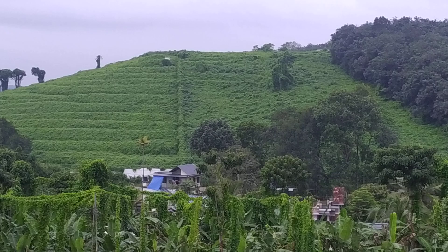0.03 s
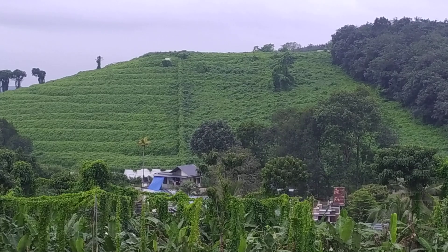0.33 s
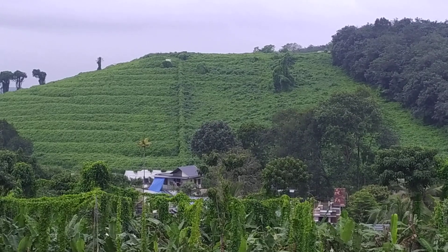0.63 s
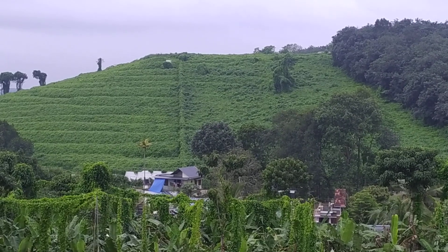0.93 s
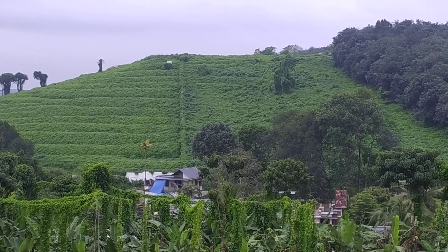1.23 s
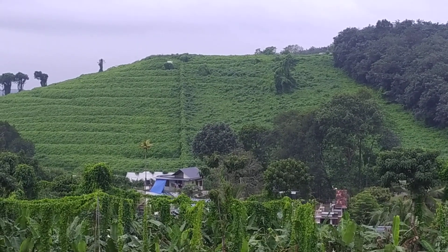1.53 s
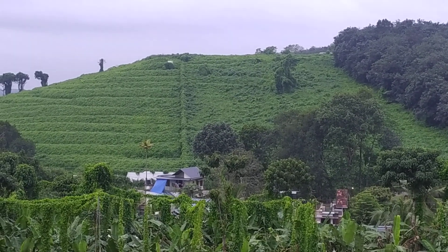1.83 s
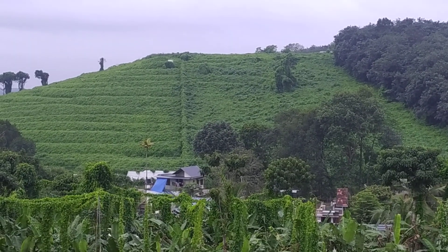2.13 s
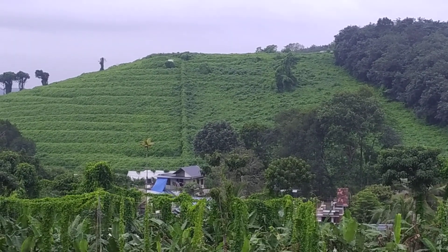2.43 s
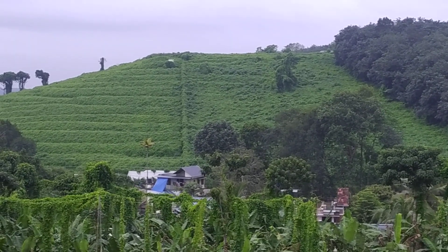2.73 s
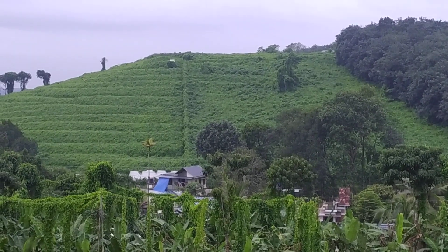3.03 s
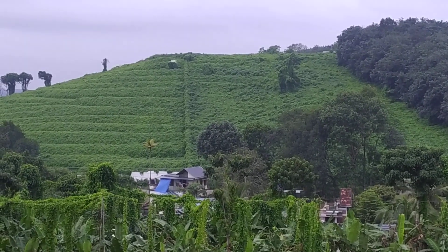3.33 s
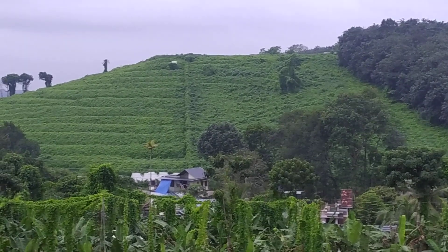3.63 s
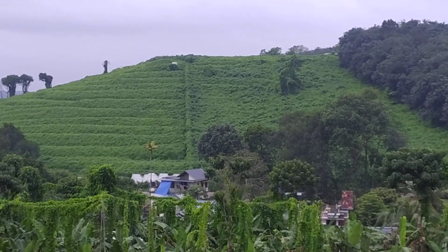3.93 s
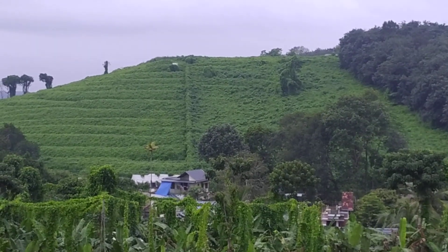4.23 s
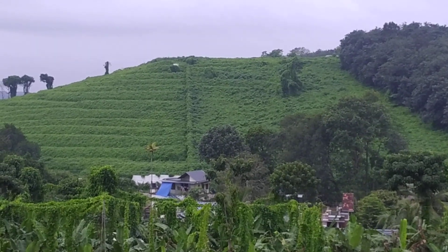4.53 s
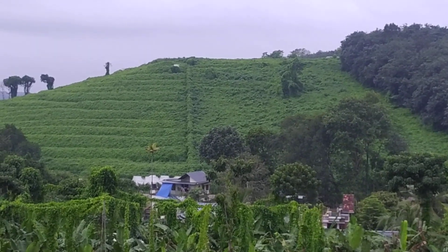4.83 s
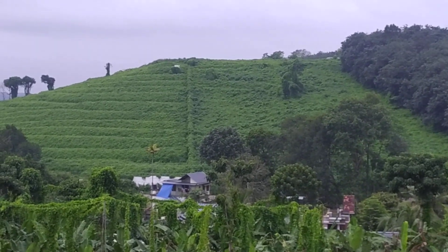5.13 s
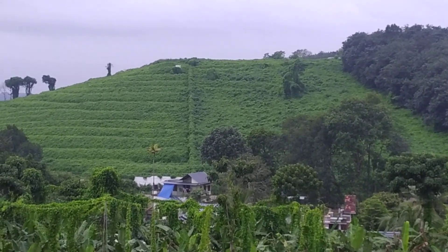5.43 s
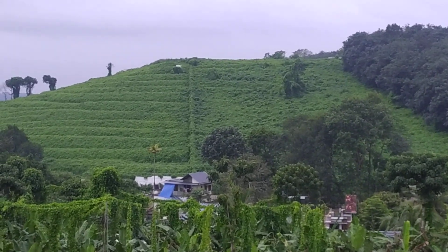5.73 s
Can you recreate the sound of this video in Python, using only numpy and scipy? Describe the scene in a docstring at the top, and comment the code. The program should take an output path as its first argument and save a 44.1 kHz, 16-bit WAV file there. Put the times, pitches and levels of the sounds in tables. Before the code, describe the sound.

A dense, high-pitched insect chorus fills an open hillside, with two nearby bush crickets chirping in and out of step over a soft rush of air. Small birds peep and whistle faintly, and a distant horn gives two brief, quiet toots. Wind begins to buffet the microphone, mostly on the right, and grows into strong rumbling thumps at the end, when a frog gives one short rattle on the left.

```python
"""A green hillside above a valley. Insects shrill by stridulation over a low rush of air: a dense
chorus, two near bush crickets drifting in and out of step, and a softer, lower one. Small birds peep
and whistle, a far motorbike horn toots twice and a frog rattles, all scattered by trees and slopes.
Turbulent gusts buffet the microphone, mostly its right port, and grow strong at the end."""
import sys
import numpy as np
from scipy import signal
from scipy.fft import rfft, irfft, next_fast_len
from scipy.io import wavfile
from scipy.ndimage import map_coordinates

SR = 44100
rng = np.random.default_rng(int(sys.argv[2]) if len(sys.argv) > 2 else 0)


def store_pcm(level_fs):
    """Save levels as 16-bit WAV."""
    pcm = np.round(np.clip(level_fs, -1, 1) * 32767).astype(np.int16)
    wavfile.write(sys.argv[1], SR, np.atleast_2d(pcm).T)


N = 263277
T = np.arange(N) / SR


def amp(db):
    """Amplitude ratio of a level in decibels."""
    return 10 ** (np.asarray(db) / 20)


def unit(x):
    """Normalisation to rms 1."""
    return x / np.sqrt(np.mean(x ** 2) + 1e-20)


def along(points, hz):
    """Interpolation of (frequency_hz, value) points on a logarithmic axis."""
    knots_hz, values = np.transpose(points)
    return np.interp(np.log(hz + 1), np.log(knots_hz + 1), values)


def curve(points):
    """Linear interpolation of (time_s, value) points at every sample."""
    return np.interp(T, *np.transpose(points))


def wobble(rate_hz, n=N):
    """Smooth random modulation: a spline through Gaussian knots."""
    knots = rng.standard_normal(int(n * rate_hz / SR) + 4)
    return map_coordinates(knots, [T[:n] * rate_hz])


def filtered(x, response):
    """Linear filtering: the spectrum times a frequency response."""
    size = next_fast_len(N + SR // 2)
    hz = np.fft.rfftfreq(size, 1 / SR)
    return irfft(rfft(x, size) * response(hz), size)[..., :N]


def coloured(x, spectrum):
    """Spectral shaping by (frequency_hz, gain_db) points, at rms 1."""
    return unit(filtered(x, lambda hz: amp(along(spectrum, hz))))


def noise():
    """White noise, uncorrelated between the ears."""
    return rng.standard_normal((2, N))


def pan(pan_db):
    """Interaural level difference at constant power; positive is left."""
    ratio = amp(np.atleast_1d(pan_db))
    return np.array([ratio, np.ones_like(ratio)]) * np.sqrt(2 / (1 + ratio ** 2))


def add(track, start_s, sound):
    """Superposition of a sound on a track."""
    part = track[..., round(start_s * SR):][..., :sound.shape[-1]]
    part += sound[..., :part.shape[-1]]


def note(length_s, start_hz, end_hz, taper, waver_hz=0, swell_db=0, bend=1):
    """Frequency modulation: a soft-edged, gliding sine; a bend over 1 puts the glide late."""
    n = int(length_s * SR)
    progress = np.linspace(0, 1, n)
    pitch_hz = start_hz + (end_hz - start_hz) * progress ** bend + waver_hz * wobble(400, n)
    envelope = amp(swell_db * (progress - 0.5)) * signal.windows.tukey(n, taper)
    return np.sqrt(2) * envelope * np.sin(2 * np.pi * np.cumsum(pitch_hz) / SR)


def valley(x, wet_db, t60_s):
    """Reverberation: trees and slopes scatter a diffuse, decaying tail back to each ear."""
    t = T[:SR]
    build_up = 1 - np.exp(-t / 0.0021)
    tail = rng.standard_normal((2, SR)) * amp(-60 * t / t60_s) * build_up
    tail /= np.linalg.norm(tail, axis=1, keepdims=True)
    return x + amp(wet_db) * signal.fftconvolve(x, tail, axes=1)[:, :N]


# Spectra of the chorus and of the far insects' hiss: frequency_hz, gain_db
CHORUS_SPECTRUM = [(6000, -45), (6900, -28), (7250, -6.5), (7650, 1), (8050, 4), (8700, 2), (9000, -3),
                   (9500, 0.5), (10000, -1), (10400, -6), (10700, -34)]
HISS_SPECTRUM = [(2900, -38), (3300, 6), (3600, 4), (4030, 12), (4500, 5), (5000, 4), (5600, 7.5),
                 (6500, -0.5), (7500, -1)]
# Direction of the chorus: frequency_hz, pan_db
CHORUS_BALANCE = [(7000, -1.5), (9200, -6.5), (9750, 0), (10500, 19)]


def chorus():
    """Incoherent summation: countless insects merge into a shrill, grainy band above a faint hiss."""
    grain_db = 1.3 * np.array([wobble(520), wobble(520)]) + 0.12 * wobble(6.3)
    band = coloured(amp(grain_db) * noise(), CHORUS_SPECTRUM)
    shrill = filtered(band, lambda hz: pan(along(CHORUS_BALANCE, hz)))
    return amp(-43) * shrill + amp(-56.5) * coloured(noise(), HISS_SPECTRUM)


# Spectrum of the valley's air: frequency_hz, gain_db
AIR_SPECTRUM = [(20, 7.5), (60, 10), (120, 7.5), (200, 10.5), (300, 5.5), (420, 1.5), (620, 4), (880, -3),
                (1120, 3), (1370, -5.5), (1580, -0.5), (1750, -5), (1950, -1.5), (2400, -2.5), (2900, -4.5),
                (3300, -6)]
# Likeness of the air at the two ears: frequency_hz, coherence
AIR_COHERENCE = [(40, 1), (190, 1), (600, 0.82), (1070, 0.096), (3400, 0.032), (6000, 0.1)]
# Strength of the rush: time_s, level_db
AIR_LEVELS = [(.8, -48), (3.4, -47.5), (5.4, -49)]


def air():
    """Interaural coherence: the valley's steady rush is alike in both ears only in the bass."""
    def mid_and_side(hz):
        angle = np.arccos(along(AIR_COHERENCE, hz)) / 2
        return np.array([np.cos(angle), np.sin(angle)]) / np.sqrt(1 + (hz / 3250) ** 40)  # low-pass

    mid, side = filtered(coloured(noise(), AIR_SPECTRUM), mid_and_side)
    return amp(curve(AIR_LEVELS)) * unit(np.array([mid + side, mid - side]))


def stridulation(chirps, width_s, stroke_hz, sharpness, wing):
    """Resonant excitation: a chirp is a swelling run of strokes, each scraping the wing's resonance."""
    power = np.zeros(N)
    lead_s = 0.25
    chirp = np.exp(-2 * abs((T[:SR // 2] - lead_s) / width_s) ** 2.7)
    for crest_s, relative_db in chirps:
        add(power, crest_s - lead_s, amp(relative_db) ** 2 * chirp)
    cycles = np.cumsum(stroke_hz * (1 + 0.03 * wobble(14))) / SR
    strokes = 1 + sharpness * np.exp(-(cycles % 1) / 0.35)  # each starts with a catch of the file
    return np.sqrt(power) * coloured(strokes * noise(), wing)


# Bouts of song between short rests: first_chirp_s, last_chirp_s, chirp_count
LOW_BOUTS = [(.385, 2.59, 15), (3.0, 3.95, 7), (4.37, 5.17, 6), (5.58, 5.89, 3)]
# Resonance of the lower cricket's wing: frequency_hz, gain_db
LOW_RESONANCE = [(4800, -39), (5500, -8.5), (5800, 4), (6050, -3.5), (6350, -3), (6800, -47)]


def low_cricket():
    """Stridulation at a lower resonance: a farther cricket sings quick, evenly spaced chirps."""
    chirps = [(crest_s, rng.normal(0, 1)) for bout in LOW_BOUTS for crest_s in np.linspace(*bout)]
    song = stridulation(chirps, width_s=0.041, stroke_hz=140, sharpness=0.36, wing=LOW_RESONANCE)
    return amp(-60.5) * pan(3.3) * song


# Chirps of the bush crickets on the right and in front: crest_s, relative_db
RIGHT_CHIRPS = [(.44, -6), (.57, 0), (.78, 0), (.99, 0), (1.15, -2), (1.36, -0.5), (1.58, 0.5), (1.76, -1),
                (2.0, -7), (2.16, -7), (2.4, -3), (2.59, -3), (2.79, -11), (2.96, -2.5), (3.12, 0.5),
                (3.28, -1), (3.56, 3), (3.79, 2), (4.0, 1), (4.28, 0.5), (4.55, 3), (4.76, 1), (4.98, -2),
                (5.22, 0), (5.46, -1), (5.65, -1.5), (5.87, -1)]
FRONT_CHIRPS = [(.41, -0.5), (.61, -3), (.79, -2), (1.01, -1.5), (1.2, -1), (1.37, 0), (1.59, -3),
                (1.81, -2), (2.03, -1.5), (2.19, 1.5), (2.4, -1), (2.62, 1), (2.8, 0), (3.03, -0.5),
                (3.2, -4), (3.36, 1), (3.59, -6), (3.8, -4), (4.03, -4), (4.17, 0.5), (4.36, 2),
                (4.55, -0.5), (4.74, -1), (4.91, -1), (5.08, -2.5), (5.28, -3), (5.49, -0.5), (5.67, -3),
                (5.87, -1.5)]
# Resonance of their wings: frequency_hz, gain_db
BUSH_WING = [(6300, -47), (7000, -14), (7600, -6), (8050, 3), (8400, 1.5), (8750, 1), (9000, -11),
             (10000, -32), (10800, -42)]


def bush_crickets(stroke_hz=79.5):
    """Stridulation in two rhythms: the near bush crickets drift in and out of step."""
    right = stridulation(RIGHT_CHIRPS, width_s=0.073, stroke_hz=stroke_hz, sharpness=2, wing=BUSH_WING)
    front = stridulation(FRONT_CHIRPS, width_s=0.082, stroke_hz=stroke_hz, sharpness=1.6, wing=BUSH_WING)
    return amp(-44.5) * (pan(-7) * right + front)


# A small bird's peeps, mostly in pairs: start_s, relative_db
PEEP_NOTES = [(0.651, -58.5), (.708, -60), (0.859, -56), (.9, -61), (1.21, -63), (1.26, -63),
              (1.725, -55.5), (1.775, -58), (1.939, -62), (2.08, -61), (2.213, -56.5), (2.262, -60),
              (2.55, -60), (3.08, -55), (3.126, -57), (3.184, -60), (3.3, -57), (3.353, -59), (3.514, -61),
              (3.56, -60), (3.74, -61), (3.788, -60), (3.84, -63), (3.896, -63), (3.948, -61), (4.135, -59),
              (4.18, -61), (4.34, -57), (4.389, -56), (4.44, -59.5), (4.945, -58), (4.996, -63),
              (5.39, -65), (5.442, -58), (5.497, -60)]
# Spectrum of their echo: frequency_hz, gain_db
FOLIAGE_SPECTRUM = [(2750, -38), (3020, -5), (3300, -4.5), (3550, -40)]


def peeps(length_s=0.036, fall_hz=440, echo_crest_s=0.018):
    """Scattering: foliage blurs each brief, falling peep from far off on the left."""
    direct, echo_power = np.zeros(N), np.zeros(N)
    age = T[:SR // 4] / echo_crest_s
    blur = age * np.exp(1 - age)
    for start_s, relative_db in PEEP_NOTES:
        pitch_hz = rng.normal(3400, 36.6)
        peep = note(length_s, pitch_hz, pitch_hz - fall_hz, taper=0.9, waver_hz=130)
        add(direct, start_s, amp(relative_db) * peep)
        add(echo_power, start_s, amp(relative_db) ** 2 * blur)
    echo = np.sqrt(echo_power) * coloured(noise(), FOLIAGE_SPECTRUM)
    return pan(7.7) * (amp(-3.5) * direct + amp(-1) * echo)


# Far calls, mostly masked by the air: start_s, length_s, start_hz, end_hz, level_db
HOARSE_CALLS = [(0.696, 2.25, 1950, 2016, -64.5), (3.837, 0.325, 1910, 1875, -58.5)]


def far_calls():
    """Pitch jitter: fast wavering makes the drawn-out calls far to the right sound hoarse."""
    calls = np.zeros(N)
    for start_s, length_s, start_hz, end_hz, level_db in HOARSE_CALLS:
        add(calls, start_s, amp(level_db) * note(length_s, start_hz, end_hz, taper=0.22, waver_hz=119.6))
    return valley(calls * pan(-9), wet_db=-1.5, t60_s=0.63)


# Two songs of three whistles: start_s, length_s, start_hz, end_hz, level_db, swell_db, pan_db, waver_hz
SONG_NOTES = [(1.061, 0.13, 5130, 5125, -53.5, 3, 9, 28), (1.185, 0.094, 5120, 5160, -54, -1, 7, 30),
              (1.293, 0.14, 5190, 5350, -55.5, -5, 4, 55), (3.286, .175, 5110, 5100, -57.5, 19, 5, 25),
              (3.515, 0.095, 5120, 5190, -55, 3, 3, 30), (3.61, .09, 5200, 5400, -59.5, -7, 0, 70)]


def whistles():
    """Frequency modulation: a bird holds two thin notes nearly level, then a third frays and rises."""
    songs = np.zeros((2, N))
    for start_s, length_s, start_hz, end_hz, level_db, swell_db, pan_db, waver_hz in SONG_NOTES:
        whistle = note(length_s, start_hz, end_hz, taper=0.4, waver_hz=waver_hz, swell_db=swell_db, bend=2)
        add(songs, start_s, amp(level_db) * pan(pan_db) * whistle)
    return valley(songs, wet_db=-4, t60_s=0.9)


# A bird's down-slurs: start_s, length_s, start_hz, end_hz, level_db
SLUR_NOTES = [(1.2, .105, 6250, 4550, -59.5), (2.94, .06, 4550, 3650, -64), (3.68, .075, 6250, 4750, -58.5),
              (5.513, .085, 6200, 5200, -60)]


def down_slurs():
    """Frequency sweep: each slur fades as it falls and echoes off the slope."""
    slurs = np.zeros(N)
    for start_s, length_s, start_hz, end_hz, level_db in SLUR_NOTES:
        slur = note(length_s, start_hz, end_hz, taper=0.22, waver_hz=150, swell_db=-5.5)
        add(slurs, start_s, amp(level_db) * slur)
    return valley(slurs * pan(1.5), wet_db=3, t60_s=0.5)


# Gusts at the microphone's ports: crest_s, decay_s, left_db, right_db
PORT_GUSTS = [(1.927, 0.12, -55, -45.5), (2.562, 0.074, -50, -32), (2.66, 0.07, -55, -24.5),
              (2.909, 0.045, -42, -52), (3.717, 0.2, -44, -39.5), (3.847, 0.076, -35.5, -38.5),
              (4.018, 0.11, -37.5, -37), (4.091, 0.032, -46, -26), (4.24, 0.11, -59, -36),
              (4.489, 0.049, -62, -27.5), (4.65, 0.076, -58, -29.5), (5.232, 0.14, -33, -47),
              (5.322, 0.05, -20.5, -32), (5.426, 0.091, -30, -22.5), (5.54, 0.045, -33, -19),
              (5.654, 0.14, -31, -17.5), (5.866, 0.24, -45, -28.5)]


def gusts(rise_over_fall=0.67, floor_db=-61):
    """Addition of powers: the wind's envelope sums gusts that rise quickly and die more slowly."""
    power = np.zeros((2, N))
    for crest_s, decay_s, left_db, right_db in PORT_GUSTS:
        from_crest = np.maximum((crest_s - T) / rise_over_fall, T - crest_s) / decay_s
        power += amp([[left_db], [right_db]]) ** 2 * np.exp(-2 * from_crest ** 1.12)  # pointed crest
    return np.sqrt(power + amp(floor_db) ** 2)


# Spectra of the dull buffet and of flow catching the port's edge: frequency_hz, gain_db
BUFFET_SPECTRUM = [(12, -14), (25, 5), (65, 2.5), (110, -3.5), (200, -12), (330, -34), (640, -53),
                   (1200, -78), (2000, -120)]
EDGE_SPECTRUM = [(20, -4), (60, 3), (105, -1), (140, 0.5), (162, 4.5), (185, -1), (220, 2.5), (285, -10),
                 (330, -13), (550, -28), (840, -40.5), (1200, -40), (2600, -120)]
# How much the wind catches the edge: time_s, power_share
EDGE_SHARE = [(4.1, 0.09), (4.45, 0.64), (4.8, 0.2), (5.3, 0.96)]


def wind():
    """Turbulence at each port: a dull buffet turns bright and hollow when it catches the edge."""
    share = curve(EDGE_SHARE)
    dull = np.sqrt(1 - share) * coloured(noise(), BUFFET_SPECTRUM)
    bright = np.sqrt(share) * coloured(noise(), EDGE_SPECTRUM)
    flutter = amp(1.88 * np.array([wobble(38), wobble(35)]))
    return gusts() * unit(flutter * (dull + bright))


# The horn's toots: start_s, length_s, level_db, swell_db
HORN_TOOTS = [(2.375, 0.079, -56, 7), (2.603, 0.15, -55, 3)]
# Its partials that carry: pitch_hz, relative_db, pan_db
HORN_PARTIALS = [(2605, 1.5, -9), (2980, -15, 0), (3180, -14, 0), (3360, -3, 7), (3760, -11.5, 0)]


def horn():
    """Diaphragm vibration: two far toots arrive as a few high partials with a rasp between them."""
    partials, rasp_envelope = np.zeros((2, N)), np.zeros(N)
    for start_s, length_s, level_db, swell_db in HORN_TOOTS:
        for pitch_hz, relative_db, pan_db in HORN_PARTIALS:
            tone = note(length_s, pitch_hz, pitch_hz, taper=0.4, waver_hz=0.011 * pitch_hz,
                        swell_db=swell_db)
            add(partials, start_s, amp(level_db + relative_db) * pan(pan_db) * tone)
        crest_s = start_s + 0.87 * length_s
        rasp_envelope += amp(level_db) * np.exp(-((T - crest_s) / (0.5 * length_s)) ** 2)
    rasp = rasp_envelope * coloured(noise(), [(2000, -30), (2600, -1), (3400, -1), (3900, -7), (4300, -32)])
    flicker = amp(2 * wobble(45))
    return valley(flicker * partials + amp(-1) * rasp, wet_db=-5, t60_s=0.3)


# Single eddies that thump a port: centre_s, relative_db, pitch_hz, pan_db
PORT_EDDIES = [(2.685, -20, 89.5, -37), (4.091, -24.5, 160, -23), (4.126, -24, 109, -23),
               (4.456, -21.5, 210, -18), (4.624, -22, 166, -26), (5.321, -18.5, 240, 23),
               (5.424, -20.5, 225, -14), (5.526, -24, 90, -20), (5.546, -11.5, 221, -27),
               (5.592, -24, 320, -20), (5.627, -14, 153, -22), (5.641, -14, 406, -37),
               (5.649, -8.5, 225, -20), (5.655, -17.5, 332, -24), (5.677, -17.5, 175, -21),
               (5.696, -19.5, 272, -26), (5.717, -14.5, 140, -25), (5.75, -14.5, 100, -26),
               (5.77, -18.5, 85, -24), (5.817, -15, 150, -24), (5.856, -14.5, 167, -30),
               (5.938, -19, 173, -24)]


def eddies():
    """Vortex pressure: each passing eddy is a dip between two smaller rises."""
    thumps = np.zeros((2, N))
    lead_s = 0.02
    for centre_s, relative_db, pitch_hz, pan_db in PORT_EDDIES:
        phase = np.pi * pitch_hz * (T[:SR // 25] - lead_s)
        pressure = (2 * phase ** 2 - 1) * np.exp(-phase ** 2)
        add(thumps, centre_s - lead_s, amp(relative_db - 2.5) * pan(pan_db) * pressure)
    return thumps


def frog(start_s=5.753, spacing_s=0.0155, count=5, crest_hz=2436, crest_db=-47):
    """Pulse train: a short rattle of falling pulses on the left, pitch and level arching together."""
    rattle = np.zeros(N)
    for k in range(count):
        droop = (k / (count - 1) - 0.58) ** 2
        pitch_hz = crest_hz * (1 - 0.34 * droop)
        pulse = note(0.0098, 1.15 * pitch_hz, 0.79 * pitch_hz, taper=0.87)
        add(rattle, start_s + k * spacing_s, amp(crest_db - 16 * droop) * pulse)
    return valley(rattle * pan(17), wet_db=0, t60_s=0.38)


def scene():
    """Superposition: the pressures of all sources add at the microphone."""
    background = chorus() + air() + low_cricket() + bush_crickets()
    calls = peeps() + far_calls() + whistles() + down_slurs()
    return background + calls + wind() + horn() + eddies() + frog()


def record(dry, open_s=0.345, cutoff_hz=10750):
    """Gating and band limiting: the recorder opens after a brief silence and cuts the top treble."""
    gate = np.clip((T - open_s) / 0.002, 0, 1)
    return filtered(dry * gate, lambda hz: np.clip((cutoff_hz - hz) / 200 + 0.5, 0, 1))


dry = scene()
out = record(dry)
store_pcm(out)
```